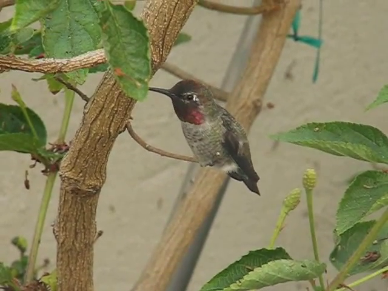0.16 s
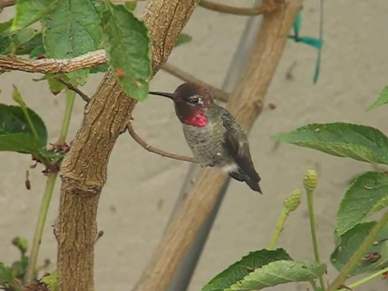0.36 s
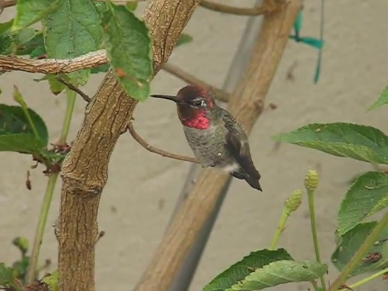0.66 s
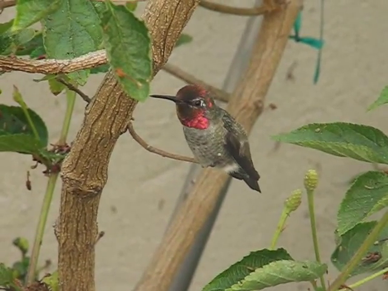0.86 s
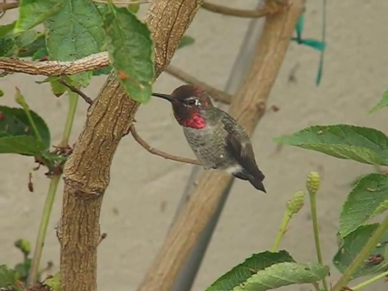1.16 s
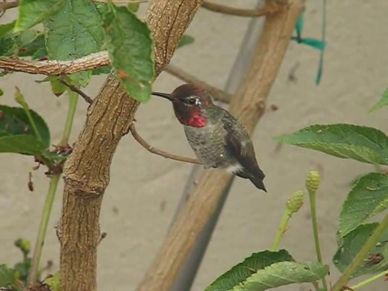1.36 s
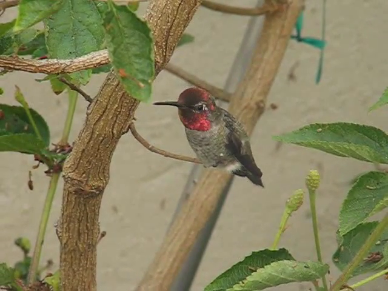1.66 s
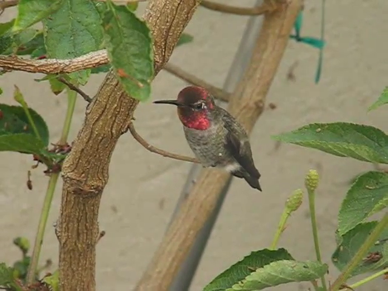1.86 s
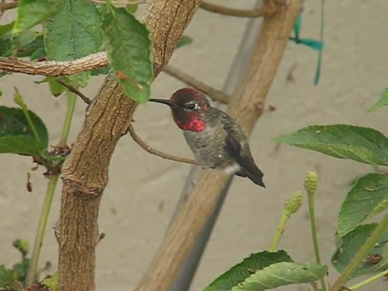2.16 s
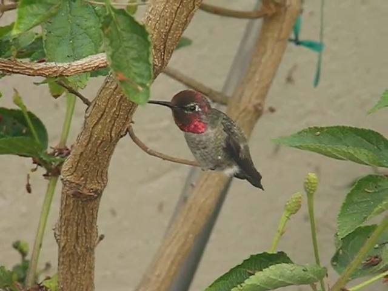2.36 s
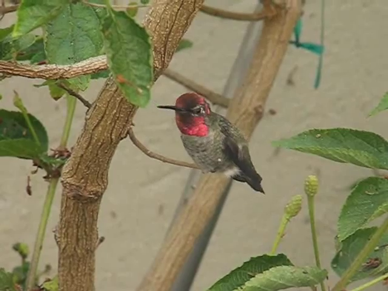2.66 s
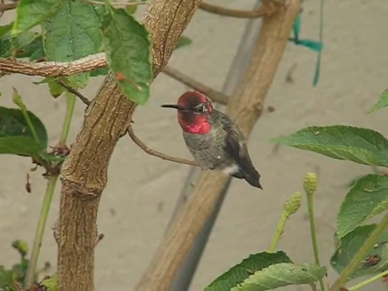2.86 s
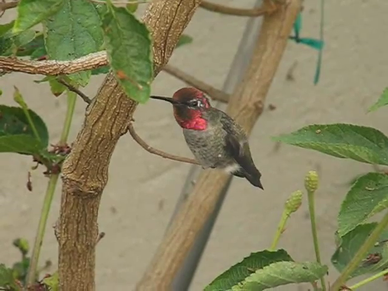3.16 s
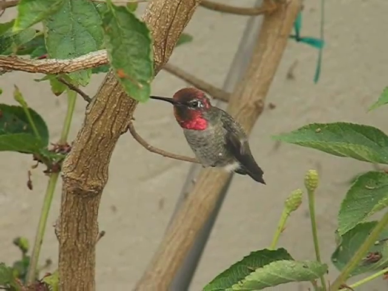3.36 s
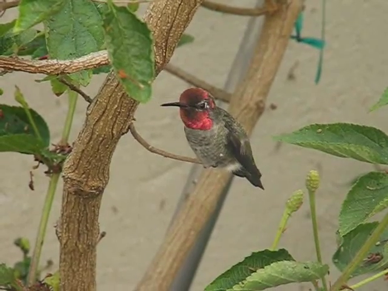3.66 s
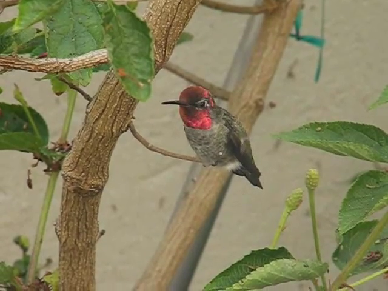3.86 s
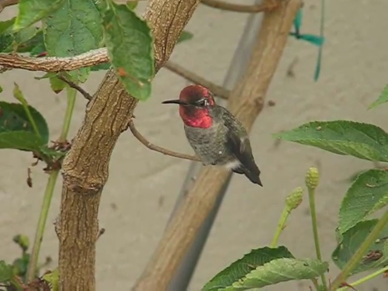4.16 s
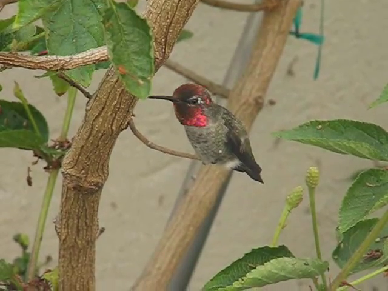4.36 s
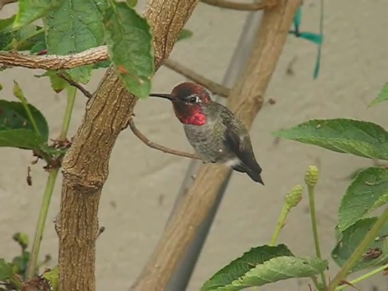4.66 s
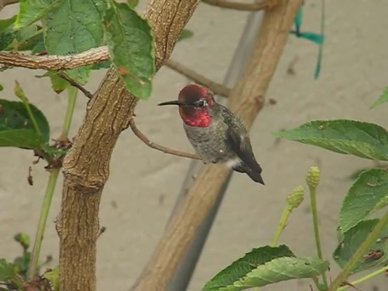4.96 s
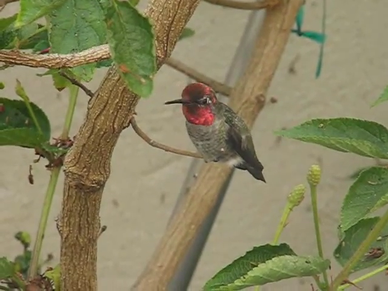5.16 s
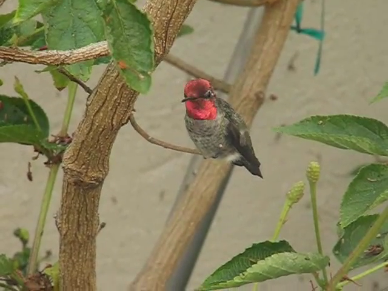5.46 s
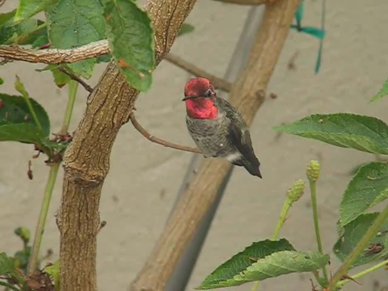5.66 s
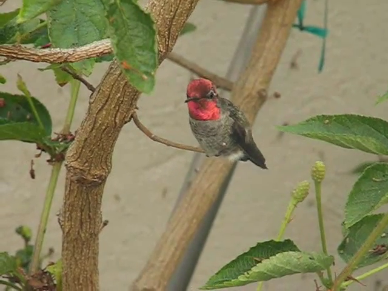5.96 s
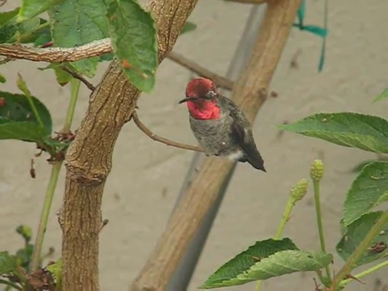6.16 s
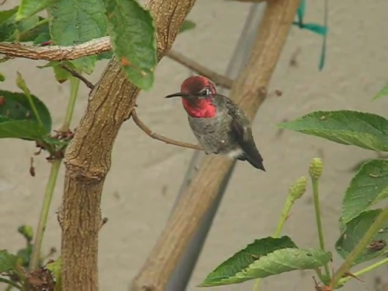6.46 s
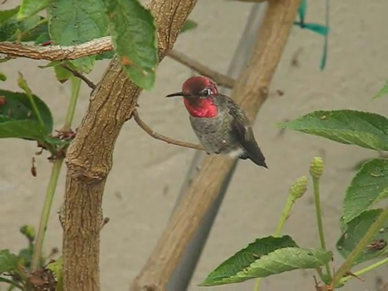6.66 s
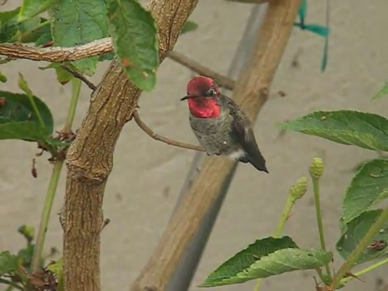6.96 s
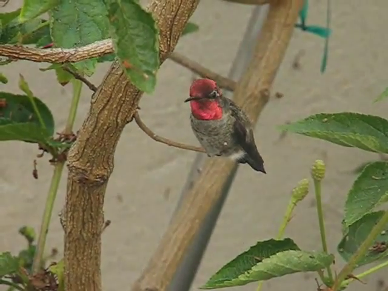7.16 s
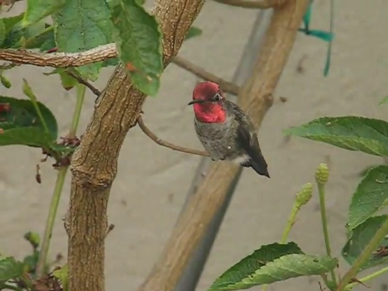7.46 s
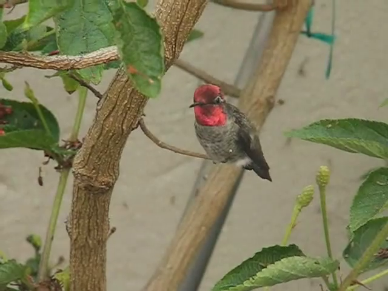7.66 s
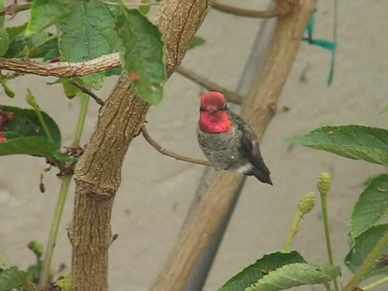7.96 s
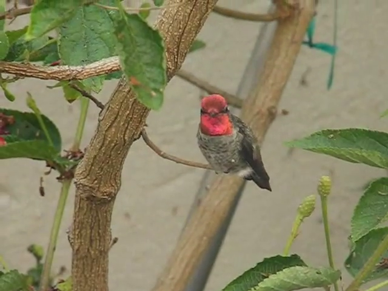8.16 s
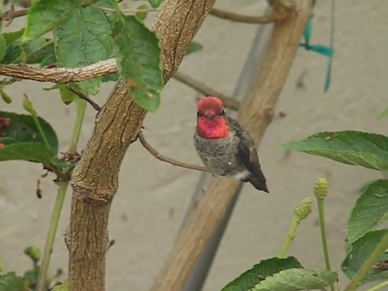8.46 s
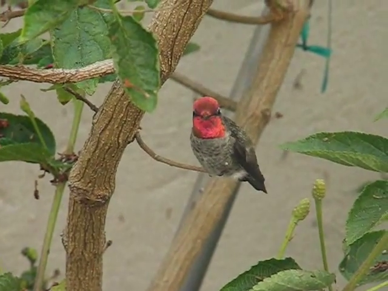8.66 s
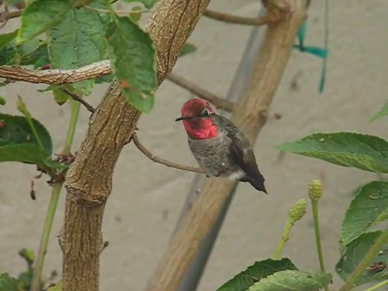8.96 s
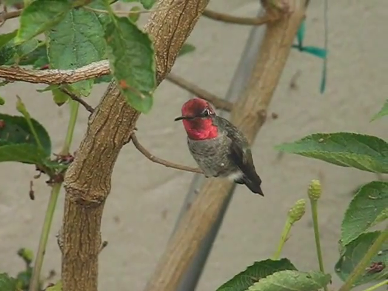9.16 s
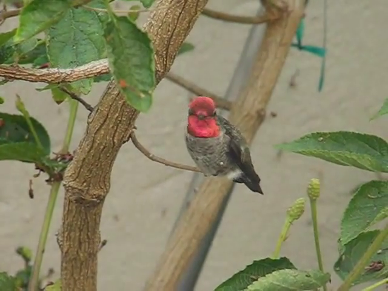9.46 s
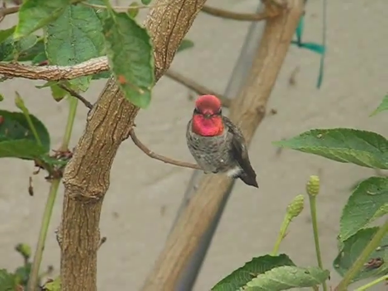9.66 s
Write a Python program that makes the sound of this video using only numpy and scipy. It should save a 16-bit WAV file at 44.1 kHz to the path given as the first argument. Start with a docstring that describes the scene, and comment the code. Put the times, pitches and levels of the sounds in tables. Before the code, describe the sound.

Very high, thin, rasping bird song in quick bouts, outdoors and close. Each bout runs through squeaks, chirps, insect-like buzz, tick runs, a nasal hiss-note and a loud squeal. The first two continue with a quavering whistle and two hissing wheezes that burst; the third stops near its squeal. Wall and yard give a brief diffuse echo, over quiet distant traffic, machine hum and low air rumble.

```python
"""By a garden wall, a perched hummingbird sings its scratchy song close to two listening ports.
Bouts run through chirps, trills, squeaks and tick runs, then a nasal note and a squeal;
the first two go on to a whistle and to two wheezes that burst. Tones are jittered oscillators that
follow pitch gestures; hisses and bursts are coloured noise. Wall and yard answer as decaying noise echoes,
another bird calls once, and filtered noise makes distant traffic, machine hum, drone and rumble."""
import sys
import numpy as np
from scipy import signal
from scipy.fft import rfft, irfft, next_fast_len
from scipy.io import wavfile
from scipy.ndimage import map_coordinates

SR = 44100
rng = np.random.default_rng(int(sys.argv[2]) if len(sys.argv) > 2 else 0)


def bounce(signal):
    """Save signal as a 16-bit WAV file at the path given by the first command-line argument."""
    frames = np.transpose(np.atleast_2d(signal))
    limited = np.clip(frames, -1, 1)
    pcm = np.round(limited * 32767).astype(np.int16)
    wavfile.write(sys.argv[1], SR, pcm)


N = 432180  # samples, 9.8 s


def amp(db):
    """Logarithmic level: decibels to amplitude gain."""
    return 10 ** (np.asarray(db) / 20)


def unit(x):
    """Normalisation: scale to an rms of 1."""
    return x / np.sqrt(np.mean(x ** 2) + 1e-20)


def along(points, hz):
    """Log-frequency interpolation of (Hz, value) points."""
    f, v = np.transpose(points)
    return np.interp(np.log(hz + 1), np.log(f + 1), v)


def clock(length):
    """Uniform sampling: sample times in seconds of a sound of this length."""
    return np.arange(max(int(length * SR), 8)) / SR


def wobble(rate, size):
    """Band-limited fluctuation: a spline through random knots, rate knots a second."""
    knots = rng.standard_normal(int(size * rate / SR) + 4)
    return map_coordinates(knots, [np.arange(size) * rate / SR])


def filtered(x, response):
    """Linear filtering: multiply the spectrum by a response of frequency."""
    size = x.shape[-1]
    m = next_fast_len(size + 2048)
    return irfft(rfft(x, m) * response(np.fft.rfftfreq(m, 1 / SR)), m)[..., :size]


def add(track, s, sound):
    """Superposition: mix a sound into the track at time s."""
    at = round(s * SR)
    sound = sound[max(-at, 0):]
    part = track[max(at, 0):][:len(sound)]
    part += sound[:len(part)]


def fade(length, edge):
    """Amplitude envelope: flat with linear ramps of edge seconds."""
    t = clock(length)
    return np.clip(np.minimum(t, t[-1] - t) / edge, 0, 1)


def gesture(shape, length=None):
    """Time scaling: pitch ratio and gain per sample, stretched to a length if one is given."""
    s, ratio, db = np.transpose(shape)
    length = length or s[-1]
    at = clock(length) * s[-1] / length
    gain = amp(np.interp(at, s, db)) * fade(length, 0.00019)
    return np.interp(at, s, ratio), gain


def phase_of(pitch):
    """Phase is the running integral of frequency."""
    return 2 * np.pi * np.cumsum(pitch) / SR


def syrinx(shape, hz, overtones_db, rough, length=None, flutter=1500, shimmer_db=2):
    """Membrane vibration as a harmonic series; roughness jitters its pitch, shimmer its strength."""
    ratio, gain = gesture(shape, length)
    pitch = hz * ratio * (1 + rough * wobble(flutter, len(gain)))
    phase = phase_of(pitch) + rng.uniform(0, 2 * np.pi)
    sizes = amp([0, *overtones_db])
    # harmonics above half the sample rate are left out
    wave = sum(g * np.sin(k * phase) * (k * pitch < SR / 2) for k, g in enumerate(sizes, 1))
    shimmer = amp(shimmer_db * wobble(flutter, len(gain)))
    return gain * unit(wave * shimmer)


# Throat colours of harsh bursts and of hisses. Each row: frequency in Hz, relative level in dB.
HARSH_COLOUR = [(1290, -57), (2200, -24.5), (2670, -24), (2890, -26), (3590, -13.5), (3740, -7.5),
                (4080, -10.5), (5960, 1), (6880, -5.5), (7950, -3), (8970, -7.5), (10700, -4), (12700, -8),
                (14500, -16), (15000, -46)]
HISS_COLOUR = [(3000, -25), (4000, -16), (4700, -6), (5800, 4), (7000, -3.5), (7800, -1), (9000, -10.5),
               (11000, -4.5), (13000, -2.5), (15000, -13)]


def rasp(length, colour, grain_db):
    """Chaotic vibration: noise broken into irregular spurts, coloured by the throat."""
    size = len(clock(length))
    spurts = rng.standard_normal(size) * amp(grain_db * wobble(884, size))
    return unit(filtered(spurts, lambda hz: amp(along(colour, hz))))


# Squeaks. Each row: start in seconds, pitch in Hz, and relative levels in dB of tone, closing sweeps, click.
SQUEAKS = [(.339, 5760, -13, -32, -26), (0.713, 5670, -13, -30.5, -25), (4.064, 5805, -14.5, -27, -24),
           (4.458, 5520, -15.5, -31, -29), (7.95, 5730, -15.5, -31, -27), (8.34, 5700, -14.5, -31.5, -23)]
# Squeak gesture. Each row: time in seconds, pitch ratio, relative level in dB.
SQUEAK_GESTURE = [(0, .93, -20), (.008, .95, -11), (.016, .99, -6), (.025, 1, -1), (.033, 1.008, 0),
                  (.037, .995, -3), (.041, .98, -25)]


def squeaks():
    """Mode locking: each squeak opens in a scrape, holds a tone with its octave and trails off in a hiss."""
    out = np.zeros(N)
    for s, hz, db, *_ in SQUEAKS:
        tone = syrinx(SQUEAK_GESTURE, hz, [-8], rough=.023, flutter=800, shimmer_db=1.8)
        scrape = rasp(.026, HISS_COLOUR, grain_db=0) * fade(.026, .0054)
        trail = rasp(.105, HISS_COLOUR, grain_db=4) * fade(.105, .03)
        add(out, s, amp(db - 1) * tone)
        add(out, s, amp(db - 17.5) * scrape)
        add(out, s + .032, amp(db - 24) * trail)
    return out


# Scratches. Each row: start in seconds, starting pitch of the falling chirp in Hz,
# and relative levels in dB of lead-in ticks, chirps, trill, buzz.
SCRATCHES = [(.039, 8600, -34, -26.5, -26.5, -39), (1.047, 8700, -30.5, -23, -22.5, -36.5),
             (3.755, 10500, -31, -22, -25, -33.5), (4.795, 9200, -29.5, -21.5, -27.5, -35.5),
             (7.636, 11000, -33.5, -22, -25.5, -39), (8.684, 9000, -30.5, -20.5, -24.5, -34)]
# Rising chirp, trill slur and tick. Each row: time in seconds, pitch ratio, relative level in dB.
RISE_GESTURE = [(0, .82, -14), (.003, .95, 0), (.008, 1.06, 0), (.014, 1.22, -4), (.021, 1.5, -12)]
SLUR_GESTURE = [(0, 1.06, -14), (.003, 1.02, 0), (.009, .985, -1), (.015, .96, -14)]
TICK_GESTURE = [(0, 0.73, 13.5), (.0007, 0.74, -2.5), (.0017, .68, -3), (.003, 0.62, -12)]
# Falling chirp. Each row: time in seconds, relative level in dB.
FALL_LEVELS = [(0, 2), (.002, 1), (.005, -4), (.009, -1), (.014, -4.5), (.021, 0), (.026, -10)]
FALL_AT, TRILL_AT, BUZZ_AT, END_AT = .073, .12, .215, .315  # s after the rising chirp


def scratches(chirp_hz=6700, land_hz=6400, low_hz=6700, high_hz=8100, trill_rate=52, buzz_rate=440):
    """Two-sided phonation: two chirps, then paired slurs of both syrinx sides that give way to a pulsed buzz."""
    out = np.zeros(N)
    for start, top_hz, _, db, trill_db, buzz_db in SCRATCHES:
        rise = syrinx(RISE_GESTURE, chirp_hz, [-6], rough=.027, flutter=2100)
        add(out, start, amp(db - 1) * rise)
        # the falling chirp starts abruptly and relaxes toward its landing pitch
        jump = top_hz / land_hz - 1
        shape = [(s, 1 + jump * np.exp(-s / .0055), level) for s, level in FALL_LEVELS]
        fall = syrinx(shape, land_hz, [-6], rough=.022, flutter=1900)
        add(out, start + FALL_AT, amp(db - 2.5) * fall)
        for s in np.arange(TRILL_AT, BUZZ_AT + .02, 1 / trill_rate):
            low_pitch = low_hz * (1 + rng.normal(0, .013))
            high_pitch = high_hz * (1 + rng.normal(0, .0263))
            low = syrinx(SLUR_GESTURE, low_pitch, [-5], rough=.058, flutter=2700)
            high = syrinx(SLUR_GESTURE, high_pitch, [-12], rough=.057, flutter=2500)
            add(out, start + s + .002, amp(trill_db - 8 + rng.normal(0, 1.2)) * low)
            add(out, start + s, amp(trill_db - 7 + rng.normal(0, 2.7)) * high)
        for s in np.arange(TRILL_AT, END_AT, 1 / buzz_rate):
            effort_db = np.interp(s, [TRILL_AT, BUZZ_AT, END_AT], [-11, 1.5, -1])
            pulse = syrinx(TICK_GESTURE, 9290, [-6], rough=.04, length=.0021)
            size = amp(buzz_db + effort_db + rng.normal(0, 1.9))
            add(out, start + s + rng.normal(0, .00015), size * pulse)
    return out


def runs(pattern, stroke, syllables, duty, rough, weak_db, hiss_db):
    """Pulse trains: each syllable (s, stretch, dB) plays alternating strong and weak strokes over a hiss."""
    out = np.zeros(N)
    for start, stretch, level in syllables:
        for offset, length, rate, hz, db in pattern:
            at, length = start + offset * stretch, length * stretch
            for k, s in enumerate(np.arange(0, length, 1 / rate)):
                size = amp(level + db + weak_db * (k % 2) + rng.normal(0, 1.85))
                pitch = hz * (1 + rng.normal(0, .046))
                # duty is the stroke's share of the interval
                sound = syrinx(stroke, pitch, [-5], rough=rough, length=duty / rate, flutter=2900)
                add(out, at + s + rng.normal(0, .0003), size * sound)
            hiss_length = length + .021
            hiss = rasp(hiss_length, HISS_COLOUR, grain_db=2.5) * fade(hiss_length, .0088)
            add(out, at, amp(level + db + hiss_db) * hiss)
    return out


# Squeals. Each row: start in seconds, upper pitch in Hz, lower pitch in Hz, relative level in dB.
SQUEALS = [(2.068, 5990, 3810, -12), (5.821, 5990, 3818, -14), (9.706, 6110, 3863, -13.5)]
# Stutters inside each pair of squeaks. Each row: start in seconds, stretch in time, relative level in dB.
STUTTERS = [(.513, 1.22, -30), (4.25, 1.09, -31), (8.138, 1, -32)]
# Tick runs. Each row: unstretched offset from the syllable in seconds, unstretched length in seconds,
# strokes per second, mean reference pitch in Hz that the gesture multiplies, relative level in dB.
LEAD_IN_TICKS = [(-.157, .032, 230, 8950, -1.5), (-.097, .034, 232, 9000, 1.5), (-.046, .017, 270, 9100, 1)]
STUTTER_TICKS = [(.073, .08, 231.7, 8840, -3.5)]
SQUEAL_TICKS = [(-.21, .06, 150.1, 7260, -32), (-.135, 0.073, 111.8, 7270, -26)]


def ticks():
    """Rapid pulse repetition: ticks lead into each scratch and each squeal, and end each stutter."""
    lead_ins = [(s, 1, db) for s, _, db, *_ in SCRATCHES]
    before_squeals = [(s, 1, db) for s, *_, db in SQUEALS]
    return (runs(LEAD_IN_TICKS, TICK_GESTURE, lead_ins, duty=.62, rough=.09, weak_db=-6.5, hiss_db=-9.5)
            + runs(STUTTER_TICKS, TICK_GESTURE, STUTTERS, duty=.574, rough=.049, weak_db=-3, hiss_db=-4.5)
            + runs(SQUEAL_TICKS, TICK_GESTURE, before_squeals, duty=.56, rough=.071,
                   weak_db=-5.5, hiss_db=-6.5))


# Nasal notes. Each row: note start in seconds, pitch in Hz, upward glide as a share of pitch,
# relative hiss level in dB, relative note level in dB.
NASALS = [(1.675, 2195, 0.08, -34, -33), (5.418, 2150, 0.113, -35, -34), (9.312, 2120, 0.033, -33.5, -32.5)]
# Sweep gesture. Each row: time in seconds, pitch ratio, relative level in dB.
SWEEP_GESTURE = [(0, 1.1, -9), (.002, .88, 0), (.005, .7, -1.5), (.008, 0.566, 0)]
# Sweep runs. Each row: unstretched offset from the syllable in seconds, unstretched length in seconds,
# strokes per second, mean reference pitch in Hz that the gesture multiplies, relative level in dB.
SQUEAK_SWEEPS = [(.109, 0.016, 185.1, 10900, -2)]
STUTTER_SWEEPS = [(0, .016, 121, 11300, -1.5), (.031, .013, 124, 11600, 1), (.063, .016, 130, 11000, -2.5)]
NASAL_SWEEPS = [(-.226, .064, 110, 10000, -3.5)]


def sweeps():
    """Frequency sweeps, slower than ticks, close each squeak, open each stutter and announce each nasal note."""
    after_squeaks = [(s, 1, db) for s, _, _, db, _ in SQUEAKS]
    before_nasals = [(s, 1, hiss_db) for s, _, _, hiss_db, _ in NASALS]
    return (runs(SQUEAK_SWEEPS, SWEEP_GESTURE, after_squeaks, duty=1, rough=.059, weak_db=-1, hiss_db=-2.5)
            + runs(STUTTER_SWEEPS, SWEEP_GESTURE, STUTTERS, duty=.9, rough=.038, weak_db=-3, hiss_db=-5)
            + runs(NASAL_SWEEPS, SWEEP_GESTURE, before_nasals, duty=1, rough=.06, weak_db=-5, hiss_db=-2))


# Scrape gesture. Each row: time in seconds before stretching, pitch ratio, relative level in dB.
SCRAPE_GESTURE = [(0, 0.97, -4), (.04, 0.94, -3.5), (.06, 1, -9)]
HISS_LENGTH, NOTE_LENGTH = .11, .098  # s from hiss to note; s of the note


def nasals():
    """Formant resonance: a scrape and a hiss give way to a note whose third and sixth harmonics stand out."""
    out = np.zeros(N)
    for s, hz, glide, hiss_db, db in NASALS:
        scrape = syrinx(SCRAPE_GESTURE, 7700, [], rough=.041, length=.14, shimmer_db=5.5)
        add(out, s - HISS_LENGTH - .04, amp(hiss_db - 10) * scrape)
        overlap = HISS_LENGTH + .02
        hiss = rasp(overlap, HISS_COLOUR, grain_db=0) * fade(overlap, .018)
        add(out, s - HISS_LENGTH, amp(hiss_db) * hiss)
        shape = [(0, 1 - glide, -5), (.25, 1, 0), (.8, 1 + glide / 4, -1), (1, 1 + glide, -3)]
        note = syrinx(shape, hz, [-10, 5, -7, -5.5, 1], rough=.0208, length=NOTE_LENGTH,
                      flutter=350, shimmer_db=3.5)
        breath = rasp(NOTE_LENGTH, HISS_COLOUR, grain_db=0) * fade(NOTE_LENGTH, .01)
        add(out, s, amp(db) * note)
        add(out, s, amp(db - 19) * breath)
    return out


# Squeal gesture. Each row: time in seconds, pitch ratio, relative level in dB.
SQUEAL_GESTURE = [(0, .95, -16), (.014, .99, -10.5), (.025, 1.03, -10.5), (.04, .99, -6.5), (.053, 1, -3),
                  (.06, .99, -9.5), (.067, .97, -4)]
CLUCK_S, CLUCK_HZ, CLUCK_DB = .143, 1795, -43  # after the squeal starts; CLUCK_HZ scales the scrape gesture


def squeals(upper_rough=0.018, lower_rough=0.041):
    """Nonlinear coupling: two voices make combination tones and turn hoarser as they swell; a cluck follows."""
    out = np.zeros(N)
    ratio, gain = gesture(SQUEAL_GESTURE)
    for s, upper_hz, lower_hz, db in SQUEALS:
        upper = phase_of(upper_hz * ratio * (1 + upper_rough * wobble(1186, len(gain))))
        lower = phase_of(lower_hz * ratio * (1 + lower_rough * wobble(1186, len(gain))))
        wave = np.sin(upper) + amp(-15.5) * np.sin(lower)
        wave += amp(-8) * np.sin(upper + lower)
        wave += amp(-10) * np.sin(2 * upper)
        wave += amp(-35) * np.sin(2 * upper - lower)
        scrape = syrinx(SCRAPE_GESTURE, 4700, [-8, -7], rough=.126, flutter=2500)
        cluck = syrinx(SCRAPE_GESTURE, CLUCK_HZ, [-6], rough=.076, length=.03)
        # the power above 1 makes hoarseness grow faster than the tone
        hoarse = gain ** 1.4 * rasp(SQUEAL_GESTURE[-1][0], HARSH_COLOUR, grain_db=2.5)
        add(out, s - .045, amp(db - 19) * scrape)
        add(out, s, amp(db - 1) * gain * unit(wave))
        add(out, s + CLUCK_S, amp(CLUCK_DB) * cluck)
        add(out, s, amp(db - 4) * hoarse)
    return out


# Whistles and twitters. Each row: start in seconds, whistle pitch in Hz, relative whistle level in dB,
# first note, accent and last-note limit in seconds, notes per second, resting twitter pitch in Hz,
# lift at the accent in Hz, relative resting twitter level in dB.
WHISTLES = [(2.233, 10050, -23, 2.301, 2.3395, 2.475, 57, 4300, 620, -31.5),
            (5.991, 9920, -20, 6.012, 6.035, 6.23, 44, 4440, 150, -38)]
# Whistle and twitter note. Each row: time in seconds, pitch ratio, relative level in dB.
WHISTLE_GESTURE = [(0, .92, -18), (.004, .98, -1), (.015, .96, 0), (.026, 1.02, -1), (.04, 1.04, 1),
                   (.047, 1, -15)]
TWEET_GESTURE = [(0, 0.97, -12), (.002, 1, -3), (.008, 1.01, -6.5), (.015, .99, -28)]
ACCENT_DB, ACCENT_RISE_S, ACCENT_FALL_S = 12, .01, .05  # lift and exponential time constants


def whistles():
    """Frequency modulation: a quavering top note, then soft even notes, higher and louder near their accent."""
    out = np.zeros(N)
    for start, hz, db, first, accent, last, rate, twitter_hz, lift_hz, twitter_db in WHISTLES:
        whistle = syrinx(WHISTLE_GESTURE, hz, [], rough=.032, flutter=900, shimmer_db=3)
        add(out, start, amp(db) * whistle)
        for s in np.arange(first, last, 1 / rate):
            effort = np.exp(-abs(s - accent) / (ACCENT_RISE_S if s < accent else ACCENT_FALL_S))
            pitch = (twitter_hz + lift_hz * effort) * (1 + rng.normal(0, .011))
            size = amp(twitter_db + ACCENT_DB * effort + rng.normal(0, 2.7))
            add(out, s, size * syrinx(TWEET_GESTURE, pitch, [-8, -6.5], rough=.02))
    return out


# Wheezes. Each row: wheeze, hiss and burst starts in seconds,
# and relative levels in dB of wheeze, hiss, burst, opening click.
WHEEZES = [(2.563, 2.686, 2.788, -33.5, -37, -18.5, -18), (3.097, 3.219, 3.321, -34, -36.5, -19.5, -27),
           (6.35, 6.473, 6.576, -32.5, -39, -18.5, -30), (7.016, 7.133, 7.238, -32.5, -35, -19, -31)]
# Wheeze gesture. Each row: time in seconds before stretching, pitch ratio, relative level in dB.
WHEEZE_GESTURE = [(0, .94, -9), (.015, .98, -2), (.05, 1, -3.5), (.09, 1.008, 0.5), (.12, 1, -4.5)]
# Burst gesture. Each row: time in seconds, pitch ratio (not played, the burst is noise), relative level in dB.
BURST_GESTURE = [(0, 1, -12), (.001, 1, 0), (.006, 1, -4), (.022, 1, -5), (.036, .96, -1), (.054, .93, 1),
                 (.061, .9, -5), (.072, .9, -25)]


def wheezes(upper_hz=5380, lower_hz=4740, upper_arch=1.5, lower_arch=0.57):
    """Amplitude modulation: two voices beat, the upper arching more, then come a hiss and a harsh burst."""
    out = np.zeros(N)
    for s, hiss, burst, db, hiss_db, burst_db, _ in WHEEZES:
        ratio, gain = gesture(WHEEZE_GESTURE, hiss - s)

        def voice(hz, arch):
            """Frequency jitter, fast and slow, on an arched pitch."""
            jitter = .012 * wobble(897.8, len(gain)) + .011 * wobble(45, len(gain))
            return phase_of(hz * ratio ** arch * (1 + jitter))

        upper, lower = voice(upper_hz, upper_arch), voice(lower_hz, lower_arch)
        # the lower voice modulates the upper one and its octave, which gives sidebands
        beat = 1 + .75 * np.cos(upper - lower)
        wave = (np.sin(upper) + .72 * np.sin(2 * upper)) * beat + .4 * np.sin(lower)
        add(out, s, amp(db) * gain * unit(wave))
        add(out, s, amp(db - 9) * gain * rasp(hiss - s, HISS_COLOUR, grain_db=3))
        gap = burst - hiss
        decay = amp(hiss_db + 3 - 37 * clock(gap))  # falls 37 dB a second
        add(out, hiss, decay * rasp(gap, HISS_COLOUR, grain_db=-2) * fade(gap, .0032))
        burst_noise = rasp(BURST_GESTURE[-1][0], HARSH_COLOUR, grain_db=2.5)
        add(out, burst, amp(burst_db) * gesture(BURST_GESTURE)[1] * burst_noise)
    return out


# Clicks before the hiss and at the end of a nasal note. Each row: offset from the note in seconds,
# relative level in dB.
NASAL_CLICKS = [(-.151, -26.5), (.093, -28)]
SQUEAK_CLICK_S = .1225  # after the start of a squeak
CLUCK_CLICK_DB = -28  # relative level


def clicks(sharp_t60=.009, raspy_t60=0.036):
    """Transient decay: sharp clicks close squeaks and open bursts; raspier ones frame nasals, follow squeals."""
    out = np.zeros(N)
    edges = [(s + SQUEAK_CLICK_S, db, sharp_t60) for s, *_, db in SQUEAKS]
    edges += [(burst, db, sharp_t60) for _, _, burst, *_, db in WHEEZES]
    edges += [(s + offset, db, raspy_t60) for s, *_ in NASALS for offset, db in NASAL_CLICKS]
    edges += [(s + CLUCK_S, CLUCK_CLICK_DB, raspy_t60) for s, *_ in SQUEALS]
    for s, db, t60 in edges:
        decay = amp(db + 1 - 60 * clock(t60) / t60)
        add(out, s, decay * rasp(t60, HARSH_COLOUR, grain_db=4.5))
    return out


# A distant bird. Each row: start in seconds, reference pitch in Hz, relative level in dB.
FAR_CALLS = [(4.841, 1256, -42)]


def far_calls():
    """Pitch jitter: another bird calls once, hoarse and faint."""
    out = np.zeros(N)
    for s, hz, db in FAR_CALLS:
        call = syrinx(SCRAPE_GESTURE, hz, [-18], rough=.047, length=.1, flutter=210)
        add(out, s, amp(db) * call * fade(.1, .02))
    return out


# Decay of the yard's tail. Each row: frequency in Hz, time to fall 60 dB in seconds.
YARD_DECAY = [(2000, 0.39), (6000, 0.4), (10000, 0.37), (15000, 0.062)]


def yard(x, wall_db=-7, tail_db=-5.0, wall_t60=0.2):
    """Reverberation: branches and wall return dense echoes, the yard a frequency-dependent diffuse tail."""
    hz, t, z = signal.stft(rng.standard_normal((2, SR // 2)), SR, nperseg=256)
    tail = signal.istft(z * amp(-60 * t / along(YARD_DECAY, hz)[:, None]), SR, nperseg=256)[1]
    wall_decay = amp(-60 * np.arange(tail.shape[1]) / SR / wall_t60)
    early = rng.standard_normal(tail.shape) * wall_decay
    answer = amp(tail_db) * tail / np.linalg.norm(tail[0])
    answer = answer + amp(wall_db) * early / np.linalg.norm(early[0])
    # the close-set ports hear partly the same echoes
    answer = answer + .2 * answer[::-1]
    delayed = np.pad(x, (round(.0012 * SR), 0))
    return signal.fftconvolve(delayed[None], answer, axes=1)[:, :N]


def echoes(x, count=4):
    """Source directivity: the bird turns its head, so each of count stretches has its own echo pattern."""
    place = np.linspace(0, count - 1, N).round()
    return sum(yard(x * (place == k)) for k in range(count))


# Traffic spectrum. Each row: frequency in Hz, relative level in dB.
TRAFFIC_COLOUR = [(12, -34), (20, -4), (135, 1), (211, -2), (796, -12), (1110, -20.5), (2100, -22.5),
                  (2340, -27), (3010, -25.5), (3460, -31.5), (5090, -23), (7300, -31.5), (9110, -36),
                  (10800, -30), (15000, -50)]
# Likeness of the ports in traffic. Each row: frequency in Hz, left-right correlation.
TRAFFIC_ALIKE = [(60, 1), (150, 0.96), (380, 1), (950, 0.9), (2380, 0.83), (5980, 0.62), (15000, 1)]
# Distant machinery. Each row: frequency in Hz, relative level in dB.
HUM = [(103, -45.5), (135, -47.5), (183, -43.5), (245, -47), (335, -46.5), (360, -46.5), (482, -51.5),
       (602, -52)]
# Swells of the drone. Each row: middle in seconds, half length in seconds (to 1/e), relative level in dB.
DRONE_SWELLS = [(.1, 0.2, -31), (1.15, .22, -29.5), (1.98, 0.19, -34)]
# Rumble of air. Each row: time in seconds, relative level in dB.
RUMBLE_LEVELS = [(0.0, -37), (0.49, -43), (1.28, -32), (1.5, -46), (4.31, -47), (4.42, -40.5), (8.46, -49),
                 (8.51, -39), (9.8, -39)]
DRONE_REST_DB = -46.5  # relative level between the swells


def background(traffic_db=-32.0, rumble_db=-1):
    """Narrow and broad bands of noise: far traffic, a wavering machine hum, a low drone, a rumble of air."""
    # mid and side shares set by half the angle whose cosine is the correlation
    turn = lambda hz: np.arccos(np.clip(along(TRAFFIC_ALIKE, hz), -1, 1)) / 2
    spread = lambda hz: amp(along(TRAFFIC_COLOUR, hz)) * [np.cos(turn(hz)), np.sin(turn(hz))]
    mid, side = filtered(rng.standard_normal((2, N)), spread)
    traffic = amp(traffic_db + .27 * wobble(2.97, N)) * unit(np.array([mid + side, mid - side]))

    def narrow(hz, width):
        """Band-pass noise, width in Hz, wavers like an unsteady tone."""
        return unit(filtered(rng.standard_normal(N), lambda f: np.abs(f - hz) < width / 2))

    t = np.arange(N) / SR
    hum = sum(amp(db) * narrow(hz, 12) for hz, db in HUM)
    swells = sum(amp(db) * np.exp(-((t - s) / half) ** 2) for s, half, db in DRONE_SWELLS)
    drone = (amp(DRONE_REST_DB) + swells) * narrow(75, 16)
    rumble = amp(rumble_db + np.interp(t, *np.transpose(RUMBLE_LEVELS))) * narrow(31, 24)
    return (traffic + hum + drone + rumble) * amp([[.6], [-.6]])  # dB left, right


# Port difference at a lean of 1. Each row: frequency in Hz, left minus right level in dB.
PORT_TILT = [(3000, -3.5), (4500, 2), (5800, 18), (7000, -2.5), (8000, -3), (11000, -2.5), (14000, -2.5)]
# Port phase at a lean of 1. Each row: frequency in Hz, lead of the left port in radians.
PORT_LEAD = [(0, 0), (3010, -0.0), (3620, 1), (5170, -0.31), (5430, -0.95), (5860, -0.76), (6460, 0.19),
             (9130, -0.31), (15200, 0.077)]
# Lean as the bird turns. Each row: time in seconds, weight of the uneven port signal.
LEAN = [(.36, 0.95), (.74, 0.62), (2.1, 0.85), (4.1, 0.85), (5.9, 0.95), (8.3, 1.08), (9.75, 0.98)]


def scene():
    """Interaural-style differences of level and phase place the bird among its echoes and the background."""
    bird = squeaks() + scratches() + ticks() + sweeps() + clicks()
    bird += nasals() + squeals() + whistles() + wheezes() + far_calls()
    balance = lambda hz: 2 / (1 + amp(np.outer([-1, 1], along(PORT_TILT, hz))))
    ports = lambda hz: balance(hz) * np.exp(.5j * np.outer([1, -1], along(PORT_LEAD, hz)))
    lean = np.interp(np.arange(N) / SR, *np.transpose(LEAN))
    direct = lean * filtered(bird, ports) + (1 - lean) * bird
    return direct + echoes(bird) * amp([[.8], [-.8]]) + background()


TOP_HZ = 15000  # amplitude is halved here


def record(dry):
    """Band limiting: a very steep low-pass removes the highest frequencies."""
    return filtered(dry, lambda hz: 1 / (1 + (hz / TOP_HZ) ** 140))


dry = scene()
out = record(dry)
bounce(out)
```